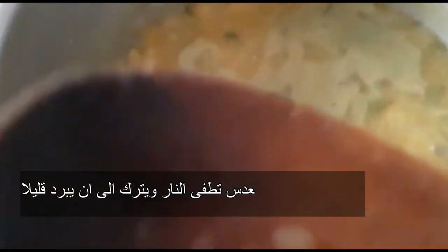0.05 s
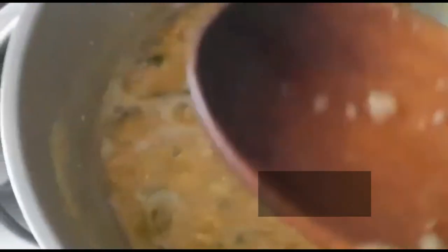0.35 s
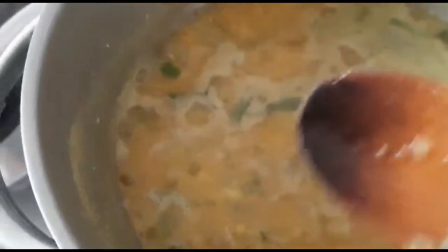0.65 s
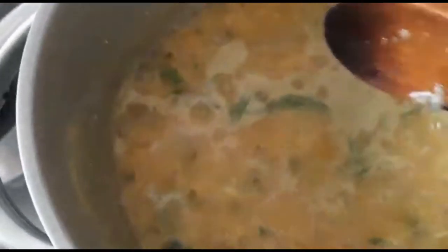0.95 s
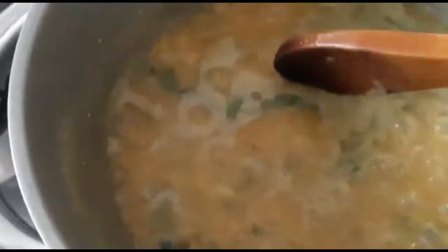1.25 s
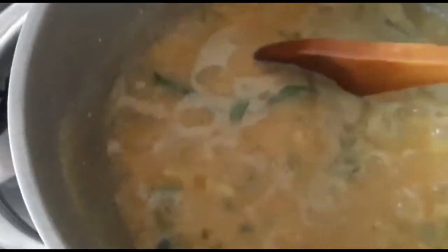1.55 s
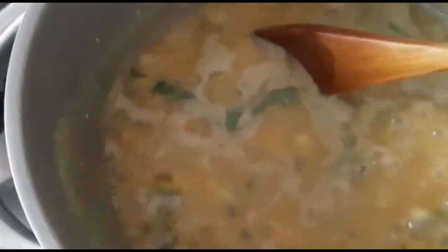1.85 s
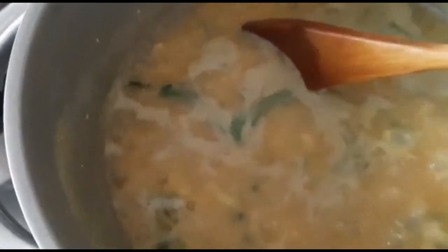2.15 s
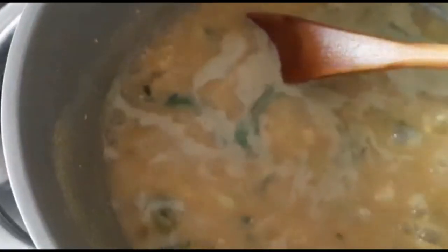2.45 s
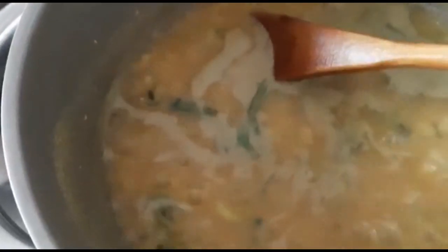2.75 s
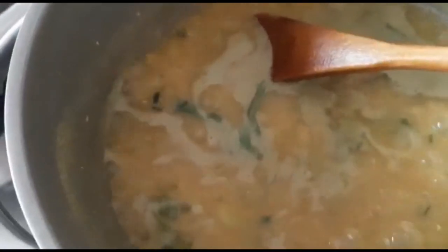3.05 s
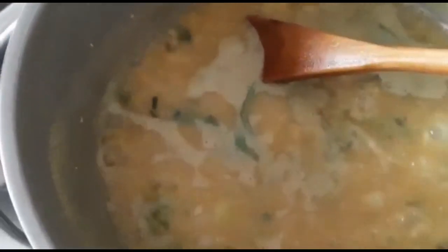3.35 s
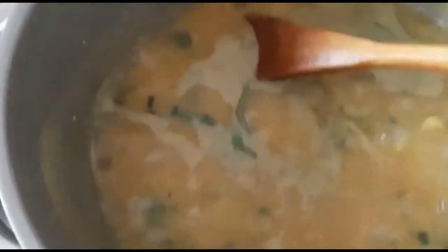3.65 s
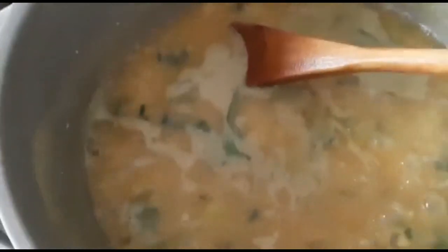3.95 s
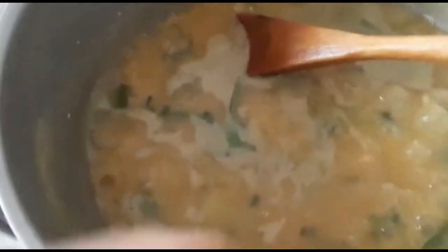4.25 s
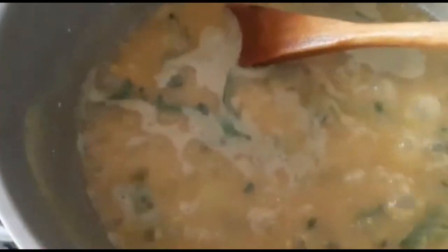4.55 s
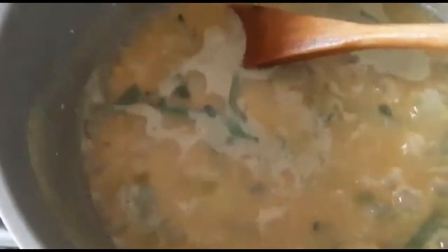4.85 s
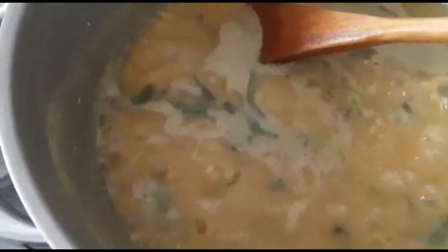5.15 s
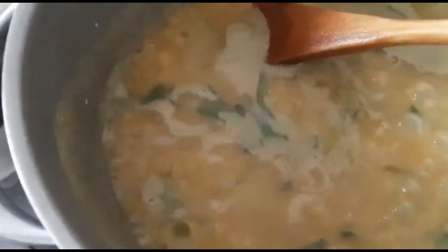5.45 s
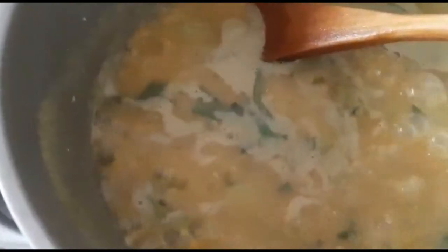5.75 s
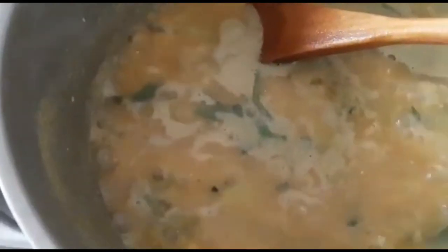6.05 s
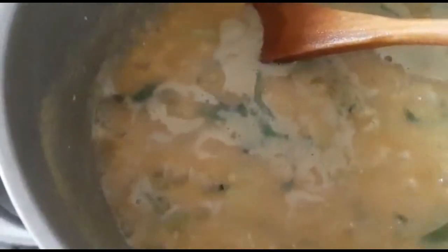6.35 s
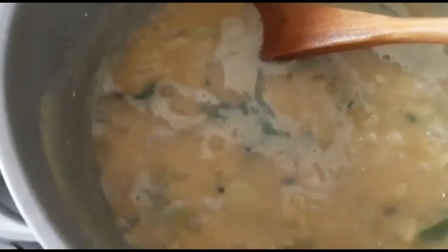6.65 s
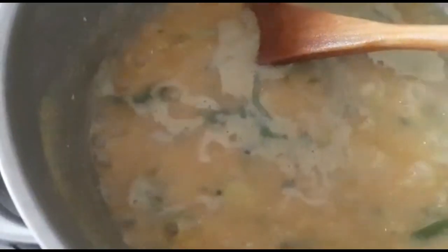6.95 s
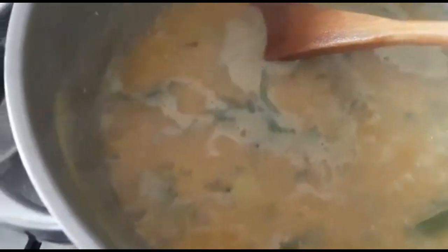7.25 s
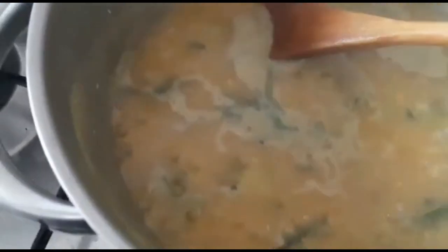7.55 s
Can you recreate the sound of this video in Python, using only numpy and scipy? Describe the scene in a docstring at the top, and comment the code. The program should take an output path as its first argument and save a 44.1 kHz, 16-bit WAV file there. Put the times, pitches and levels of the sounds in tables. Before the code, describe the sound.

Thick lentil soup simmers in a metal pot throughout, heard close and slightly to the left in a kitchen. Many small wet bubbles pop over a soft low rumble with occasional glugs, while droplets tick, spit and sizzle on the hot wall. In the first 0.2 seconds, fingers make two sharp clicks and a bump on the left side of the hand-held microphone. A wooden spoon scrapes the pot faintly and briefly at about 2.6 seconds. From 3.7 to 4.2 seconds comes a cluster of handling clicks and low thumps, much louder than the soup, the heaviest near 3.9. A very faint hiss of steam swells around 5.5 seconds. At 5.7 something knocks once across the kitchen, with a short echo. From about 6 seconds the simmer grows quieter and thinner, with a barely audible whistle near 6.8, still bubbling gently at the end, around 7.6 seconds.

```python
"""Lentil soup simmering

Thick soup simmers in a metal pot: steam rumbles and glugs at the bottom, bubbles pop on top and
drops sizzle on the hot wall, all fading as the simmer ebbs. A spoon scrapes, steam sings at the rim
and a faint whistle passes. Fingers bump and click by the left opening of the hand-held microphone,
and later something is knocked down in the kitchen."""
import sys
import numpy as np
from scipy import signal
from scipy.io import wavfile
from scipy.ndimage import map_coordinates

SR = 44100
rng = np.random.default_rng(int(sys.argv[2]) if len(sys.argv) > 2 else 0)


def digitize_waveform(pressure):
    """Quantize a signal to 16-bit integers and store it at the path in sys.argv[1].

    Rows of a 2-D input are taken as channels; values are limited to [-1, 1].
    """
    field = np.atleast_2d(pressure).T
    bounded = np.clip(field, -1, 1)
    quanta = np.round(bounded * 32767).astype(np.int16)
    wavfile.write(sys.argv[1], SR, quanta)


N = 335160
TIME = np.arange(N) / SR

# How alike left and right sound. Each row: frequency in Hz, likeness from 0 (unrelated) to 1 (same).
STEREO_LIKENESS = [(60, 0.87), (130, 0.94), (300, 0.92), (640, 0.72), (1400, 0), (3000, 0), (15000, 0)]


def from_db(db):
    """Turn decibels into a number to multiply by."""
    return 10 ** (np.asarray(db) / 20)


def rms_one(x):
    """Scale a sound so that its average strength (rms) is 1."""
    return x / np.sqrt(np.mean(x ** 2) + 1e-20)


def at_hz(points, hz):
    """Read a table's value at a frequency, with octaves evenly spaced."""
    freqs, values = np.transpose(points)
    return np.interp(np.log(hz), np.log(freqs), values)


def panned(db):
    """Left and right gains that make the left louder by db."""
    return from_db(np.array([[db], [-db]]) / 2)


def butter(x, hz, kind, order=2):
    """Keep the lows, the highs or a band; a higher order cuts more steeply."""
    return signal.sosfilt(signal.butter(order, hz, kind, fs=SR, output="sos"), x + 1e-18)


def resonance(x, hz, width):
    """Keep a band around hz, about width Hz wide."""
    r = np.exp(-np.pi * width / SR)
    feedback = [1, -2 * r * np.cos(2 * np.pi * hz / SR), r * r]
    return signal.lfilter(np.array([1, 0, -1]) * (1 - r * r) / 2, feedback, x + 1e-18)


def ring(x, hz, fade_s):
    """Each click starts a tone. Here and below, a fade time is the time to drop by 60 dB."""
    r, w = from_db(-60 / (fade_s * SR)), 2 * np.pi * hz / SR
    return signal.lfilter([0, np.sin(w)], [1, -2 * r * np.cos(w), r * r], x + 1e-18)


def add(track, start_s, sound):
    """Mix a sound into a track at a given time."""
    start = max(round(start_s * SR), 0)
    track[..., start:start + sound.shape[-1]] += sound[..., :N - start]


def arch(start_s, length_s):
    """A level that swells from nothing to 1 and back."""
    return np.sin(np.pi * np.clip((TIME - start_s) / length_s, 0, 1))


def drift(per_s):
    """A wandering curve that heads for a new random value per_s times a second."""
    targets = rng.standard_normal(4000)
    return rms_one(map_coordinates(targets, [TIME * per_s], order=1, mode="wrap"))


def grains(per_s, spread_db):
    """Clicks at random moments, many small and a few large."""
    happens = rng.random(N) < per_s / SR
    size = np.minimum(rng.exponential(1, N), 3.5)
    return happens * from_db(spread_db * size) * rng.choice([-1, 1], N)


def noise_bands(spectrum, size=N):
    """Stereo noise in half-octave bands, alike in the bass. Gives their centres in Hz and the bands."""
    edges = 22 * 2 ** np.arange(0, 9.6, .5)
    centres = np.sqrt(edges[1:] * edges[:-1])
    white, bands = rng.standard_normal((2, 2, size)), []
    for k, hz in enumerate(centres):
        mid, side = butter(white[k % 2], edges[k:k + 2], "band")
        alike = at_hz(STEREO_LIKENESS, hz)
        stereo = np.sqrt(1 + alike) * mid + np.sqrt(1 - alike) * side * [[1], [-1]]
        roll_off = min(1, spectrum[-1][0] / hz) ** 2   # quieter above the table's last row
        bands.append(roll_off * from_db(at_hz(spectrum, hz)) * stereo)
    return centres, np.array(bands) / np.std(sum(bands))


def vigour(s):
    """How lively the simmer is at time s, in dB above a full simmer."""
    # The strength of the simmer. Each row: time in seconds, level in dB.
    simmer = [(0.0, -46), (0.19, -51), (1.06, -51.5), (1.37, -52.5), (2.75, -51.5), (3.0, -52), (3.72, -50),
              (3.83, -51), (4.02, -53.5), (4.4, -54), (4.74, -56), (5.19, -54), (5.59, -52), (5.97, -53.5),
              (6.75, -60), (7.01, -59), (7.26, -59.5), (7.6, -60.5)]
    full_simmer_db = -51.5
    return np.interp(s, *np.transpose(simmer)) - full_simmer_db


def simmer_gain(full_db, follows):
    """A gain of full_db at a full simmer that moves by `follows` dB for each dB of vigour."""
    return from_db(full_db + follows * vigour(TIME))


def by_chance(per_s, level_db, ranges):
    """Random events, louder in a lively simmer. Each row: seconds, dB, one value from each range."""
    count = round(per_s * N / SR)
    starts = rng.random(count) * TIME[-1]
    levels = level_db + .54 * vigour(starts) + 1.5 * rng.standard_normal(count)
    return list(zip(starts, levels, *[rng.uniform(low, high, count) for low, high in ranges]))


def rumble():
    """Steam pockets collapse on the bottom, muffled by the thick soup."""
    # The rumble's tone colour. Each row: frequency in Hz, relative level in dB.
    spectrum = [(25, -50), (50, -24), (80, 3), (130, 0.5), (200, -2), (350, 1), (450, -14), (650, -14.5),
                (1000, -17)]
    _, bands = noise_bands(spectrum)
    lumpy = sum(band * from_db(2 * drift(25)) for band in bands)
    return simmer_gain(-47.5, follows=1.55) * rms_one(lumpy)


def small_bubbles():
    """A froth of little pops at many pitches covers the surface and thins out as the simmer ebbs."""
    # The froth's tone colour. Each row: frequency in Hz, relative level in dB.
    spectrum = [(350, -14.5), (500, -25), (640, 6), (850, 3), (1150, -7.5), (1550, -9), (2200, -14),
                (3200, -20), (5000, -45)]
    froth, pitches = np.zeros((2, N)), np.geomspace(400, 3400, 22)
    per_s = 560 * from_db(.6 * vigour(TIME))
    for k, hz in enumerate(pitches):
        bursts = grains(per_s / len(pitches), spread_db=4.3)
        pops = rms_one(ring(bursts, hz, fade_s=5.5 / hz))
        pan_db = 7 * (1 - at_hz(STEREO_LIKENESS, hz)) * (-1) ** k   # left and right by turns
        froth += panned(pan_db) * pops * from_db(at_hz(spectrum, hz)) * np.sqrt(hz)
    heard = in_pot(butter(froth, 654, "high"), pot_db=7, room_db=2.5)
    return simmer_gain(-52.5, follows=.9) * rms_one(heard)


def in_pot(x, pot_db, room_db, room_fade_s=.1):
    """The air in the pot rings along with a sound, then the kitchen echoes it."""
    # The notes of the air above the soup. Each row: pitch in Hz, width in Hz, relative level in dB.
    air_notes = [(603.5, 25, 6), (692, 140, 1), (1490, 67, 2.5), (1538, 49, -8.5), (2076, 41, 0),
                 (2260, 26, -16)]
    hollow = sum(from_db(db) * resonance(x, hz, width) for hz, width, db in air_notes)
    near = x + from_db(pot_db) * hollow
    t = TIME[:SR // 3]
    echoes = rng.standard_normal((2, len(t))) * from_db(-60 * t / room_fade_s) * (t > .002)
    echoes = butter(echoes[0], 730, "low") + butter(echoes, 1130, "high")   # both sides share the lows
    echoes /= np.sqrt(np.sum(echoes ** 2) / 2)
    return near + from_db(room_db) * signal.fftconvolve(near, echoes, axes=1)[:, :N]


def sizzle():
    """Tiny bursts crackle in flurries along the hot wall, over a smooth hiss."""
    # The hiss's tone colour. Each row: frequency in Hz, relative level in dB.
    spectrum = [(1500, 6.5), (2400, 6), (3200, -14), (4500, 8), (5800, 10.5), (7000, -13), (10000, 6.5),
                (15000, -26)]
    crackle, pitches = np.zeros((2, N)), np.geomspace(3800, 6600, 8)
    per_s = 800 * from_db(4.3 * drift(20))
    for hz in pitches:
        bursts = np.array([grains(per_s / len(pitches), spread_db=4.2) for side in range(2)])
        crackle += ring(bursts, hz, fade_s=9 / hz)
    crackle = rms_one(butter(crackle, 2300, "high"))
    _, bands = noise_bands(spectrum)
    return simmer_gain(-61.5, follows=1) * rms_one(crackle + from_db(3) * sum(bands))


def fine_crackle():
    """The tiniest bursts prickle over a faint, very high hiss."""
    bursts = rms_one(np.array([grains(per_s=500, spread_db=5) for side in range(2)]))
    hiss = rng.standard_normal((2, N))
    prickle = butter(hiss + from_db(-1) * bursts, 11850, "high", order=3)
    return simmer_gain(-73.5, follows=.98) * rms_one(prickle)


def finger_bumps(opening_hz=57.4, sharpness=1.27):
    """Fingers push air into the microphone's opening, whose bass cut makes each push swing back."""
    # Pushes of air. Each row: time in seconds, relative level in dB, half-width in seconds.
    bumps = [(0.041, -18.5, 0.00072), (0.178, -3, 0.00083), (3.6864, -13.5, 0.00053), (3.7412, -7, 0.00081),
             (3.8897, 6, 0.001), (4.0336, -16, 0.002), (4.057, -13.5, 0.00024), (4.085, -23, 0.0021),
             (4.1283, -13.5, 0.000087), (4.199, -20, 0.0023), (4.2386, -12.5, 0.00067)]
    pushes, t = np.zeros(N), TIME[:SR // 25]
    middle = t[-1] / 2
    for s, db, width in bumps:
        age = (t - middle) / width
        push = np.exp(-age ** 2 / 2)
        puff = .44 * np.exp(-((age + .99) / .42) ** 2 / 2)   # a brief opposite puff comes first
        add(pushes, s - middle, from_db(db) * (push - puff))
    w = 2 * np.pi * opening_hz
    bass_cut = signal.bilinear([1, 0, 0], [1, w / sharpness, w * w], SR)
    return butter(signal.lfilter(*bass_cut, pushes), 69, "high", order=1)


def finger_clicks():
    """Fingers tap the microphone's casing, which clicks and then rings briefly, hollow or bright."""
    # Taps. Each row: time in seconds, level in dB, pitch in Hz, half-width in seconds,
    # ring level in dB, ring brightness in dB per octave, gritty snap in dB relative to the click.
    taps = [(0.0395, -2, 5400, 0.00011, -26, 7, 3), (0.1766, -11, 3400, 0.00011, -11, -3, 1),
            (3.6843, -6, 5050, 0.00014, -28, 19, -5), (3.8927, -21, 5260, 0.00008, -52, 0, 6.5),
            (4.0557, -26, 3500, 0.00012, -37, -5, 3), (4.1302, -7.5, 4600, 0.00014, -8, -1, -6),
            (4.2383, -14, 610, 0.0012, -20, 3, -25)]
    # The casing's notes. Each row: pitch in Hz, relative level in dB, fade time in seconds.
    casing_notes = [(855, 0.5, 0.0057), (1570, -10.5, 0.007), (2320, -13.5, 0.0052)]
    out, t = np.zeros(N), TIME[:SR // 25]
    middle, lowest_hz = t[-1] / 2, casing_notes[0][0]
    grits = butter(rng.standard_normal((len(taps), len(t))), 6900, "high", order=4)
    for (s, db, hz, width, ring_db, tilt_db, snap_db), grit in zip(taps, grits):
        swell = np.exp(-((t - middle) / width) ** 2 / 2)
        click = np.sin(2 * np.pi * hz * (t - middle)) + from_db(snap_db) * grit
        add(out, s - middle, from_db(db) * swell * click)
        for k, (note_hz, note_db, fade_s) in enumerate(casing_notes):
            start_db = ring_db + note_db + tilt_db * np.log2(note_hz / lowest_hz)
            level = from_db(start_db - 60 * t / fade_s)
            add(out, s, (-1) ** k * level * np.sin(2 * np.pi * note_hz * t))
    return out


def spits():
    """A splash hits the hot wall, flashes to steam and dies away, sputtering."""
    # Splashes. Each row: start in seconds, relative level in dB, fade time in seconds.
    splashes = [(0.059, -49, 0.15), (.295, -52, 0.22), (0.52, -47, 0.3), (1.214, -48, 0.29),
                (1.617, -35.5, 0.26), (3.398, -36, 0.16), (4.021, -41, 0.14), (5.845, -37.5, 0.091),
                (6.07, -53, 0.34), (6.921, -76, 0.14)]
    steam, t = np.zeros((2, N)), TIME[:SR // 3]
    for s, db, fade_s in splashes:
        add(steam, s, rng.standard_normal((2, len(t))) * from_db(db - 60 * t / fade_s))
    sputter = rms_one(from_db(3 * drift(500)))
    return butter(butter(steam * sputter, 2330, "high"), 7140, "low", order=1)


def bubble(t, hz, cycles, rise):
    """The hollow of one open bubble rings for a few cycles while its pitch rises."""
    t = np.maximum(t, 0)
    age = t * hz / cycles
    pitch = hz * (1 + rise * (np.minimum(age, .5) - .15)) * (t > 0)
    swell = (1 - np.exp(-2 * t * hz)) ** 2
    level = swell * from_db(-60 * age)
    return np.sin(2 * np.pi * np.cumsum(pitch) / SR) * level / level.max()


def large_bubbles(rise=.7, snap_s=.0016):
    """A bubble's skin tears with a snap, its hollow rings, and a smaller one follows as the soup closes."""
    # The largest bursts. Each row: start in seconds, relative level in dB, pitch in Hz,
    # left over right in dB, ring length in cycles.
    biggest = [(0.0616, -29, 1460, 16, 2.6), (0.0665, -35, 2060, 7, 4), (0.0775, -39, 1900, 9, 3.7),
               (0.0922, -36.5, 790, 20, 4.3), (0.1951, -31.5, 700, 2, 5.5), (0.2658, -36, 1290, 3, 1.6),
               (0.3036, -33.5, 1040, 8, 5.2), (0.3144, -37, 1610, -2, 8.5), (0.3564, -33, 780, 1, 11),
               (0.4102, -32.5, 980, 1, 12), (0.4514, -34.5, 820, 2, 6.1), (0.4914, -36, 1550, -1, 6.1),
               (0.5211, -33.5, 1510, 1, 10), (0.5436, -39.5, 1560, 2, 10), (0.5682, -31.5, 1400, -7, 10),
               (0.5849, -43, 1520, 9, 8.8), (0.6172, -43, 760, 1, 8.8), (0.644, -47, 780, 0, 8.9),
               (0.6615, -43, 790, 4, 5.2), (0.6873, -37.5, 730, 1, 12), (0.7749, -37, 1150, 7, 8),
               (0.8028, -31.5, 750, 0, 7.5), (0.8272, -46, 710, 1, 11), (0.8822, -38.5, 775, -2, 6.3),
               (0.972, -38, 710, 0, 21), (1.1595, -38, 850, 3, 6.4), (1.1873, -39.5, 1470, -5, 4.6),
               (1.2142, -39.5, 780, 4, 10), (1.2999, -40.5, 1380, 9, 16), (1.329, -47, 775, 11, 13),
               (1.3864, -45, 746, 4, 8.9), (1.4231, -40.5, 1380, 3, 6.1), (1.4776, -40, 765, 1, 5.9),
               (1.58, -34.5, 760, 1, 7.9), (1.6103, -35, 1860, 2, 3), (1.6396, -36.5, 1280, -6, 6.2),
               (1.6794, -34.5, 1480, 3, 6.8), (1.731, -40.0, 1390, 4, 9), (1.8467, -29.5, 1180, 4, 5),
               (1.862, -35, 910, 2, 7.2), (1.8792, -41.5, 1500, 2, 13), (1.9635, -37.0, 1430, 2, 6.5),
               (2.0063, -37, 765, 3, 5.7), (2.0741, -39.5, 756, 3, 8.5), (2.1128, -38.5, 2000, 5, 15),
               (2.157, -42.5, 690, 0, 10), (2.2346, -42, 1610, -4, 16), (2.276, -35, 750, 5, 6.1),
               (2.3006, -31.5, 1040, 4, 2), (2.3608, -32.5, 890, 4, 5), (2.3745, -39.5, 1520, 1, 7.8),
               (2.3918, -36, 780, 1, 4.5), (2.4121, -33, 1230, 6, 3.8), (2.5011, -35, 1020, 0, 5.1),
               (2.5473, -41, 1520, 10, 10), (2.5716, -37.5, 1450, 10, 12), (2.6451, -34, 700, 5, 5),
               (2.6678, -40.5, 1600, 16, 4), (2.7043, -36.5, 1490, 12, 14), (2.738, -36, 750, 2, 4.4),
               (2.7985, -43, 1450, 12, 10), (2.8142, -38, 875, 2, 6.4), (2.8484, -38.5, 1810, 4, 9.1),
               (2.8822, -37.5, 756, 2, 7), (2.9246, -37, 1390, -1, 3), (2.9897, -43, 1580, -5, 9.2),
               (3.0256, -40, 740, 0, 5.4), (3.0726, -33, 866, 3, 4.4), (3.1105, -38, 2400, 2, 8.5),
               (3.1194, -26.0, 1140, 3, 3.4), (3.1437, -41, 756, 3, 10), (3.24, -32.5, 1060, 0, 9.3),
               (3.2924, -33.5, 1100, 7, 10), (3.4007, -31.5, 2110, 9, 2.2), (3.5024, -37, 806, 4, 11),
               (3.7034, -27, 1430, 0, 2.4), (3.7266, -31.5, 1440, -7.5, 10), (3.7626, -33, 1500, -5, 9.3),
               (3.8503, -31.5, 1800, 4, 4.3), (4.0034, -37, 1800, 14, 3.7), (4.0294, -31.5, 1570, 8, 3.6),
               (4.2045, -28.5, 1500, 6, 1.6), (4.2898, -40, 1130, 5, 2.8), (4.3221, -29, 1400, 5, 2.8),
               (4.3376, -44, 1180, 0, 3.8), (4.4062, -33, 1510, 0, 4.2), (4.4308, -37.5, 1340, 7, 2.8),
               (4.4963, -37.5, 1390, 2, 8.4), (4.5231, -37, 1390, 4, 3), (4.5517, -34.5, 1450, 1, 13),
               (4.5689, -44, 776, 5, 5), (4.5924, -38.0, 1480, 4, 19), (4.671, -41, 1050, 4, 13),
               (4.721, -36.5, 1380, 3, 4.1), (4.7928, -41.5, 1350, 7, 6.4), (4.8217, -48.5, 670, 1, 7.7),
               (4.9181, -45.5, 930, 4, 10), (4.9513, -35.5, 1800, 4, 4.9), (4.9953, -44, 1330, 2, 4.8),
               (5.0107, -38.0, 905, 3, 5.6), (5.0734, -43, 766, 6, 6.4), (5.2111, -29.5, 1380, 3, 16),
               (5.2339, -47, 1440, 3, 12), (5.3569, -41, 2150, 0, 13), (5.3978, -30.5, 1320, 2, 5.1),
               (5.4187, -38.5, 740, 0, 6.4), (5.4373, -42, 750, 6, 5.2), (5.4804, -36, 890, 6, 8.8),
               (5.8748, -31, 1380, 2, 3.5), (6.0285, -38, 920, 0, 3.4), (6.0541, -36.5, 844, 1, 2.7),
               (6.0684, -42, 1400, 7, 12), (6.0953, -37.5, 1020, 5, 7.8), (6.1817, -42, 1450, 3, 10),
               (6.1966, -36.5, 694, 3, 5.1), (6.2837, -35, 1500, 2, 10), (6.3816, -37.5, 1390, -1, 8.9),
               (6.4279, -35, 990, 2, 3.3), (6.4492, -35.5, 1490, 5, 12.5), (6.522, -39.5, 1470, 10, 10),
               (6.537, -58, 1520, -4, 8.1), (6.6109, -41, 1940, 7, 2.6), (6.6464, -46.5, 800, 7, 17),
               (6.7069, -46.5, 780, 4, 4.5), (6.7334, -52, 810, 1, 11), (6.7637, -42, 930, 2, 2.3),
               (6.7953, -55, 820, -2, 6.3), (6.9281, -43, 690, 2, 5), (7.0805, -51, 654, 7, 10),
               (7.1341, -43, 1440, 4, 3.8), (7.2178, -43.5, 800, 2, 5.4), (7.2652, -45, 730, 3, 8.4),
               (7.3257, -41.5, 790, 5, 2.8), (7.3491, -40.5, 1310, 4, 5.6), (7.3951, -51, 1410, 8, 11),
               (7.472, -44, 2040, 6, 3.5), (7.5449, -44, 730, 1, 5.4)]
    pops = list(biggest) + by_chance(per_s=8, level_db=-45, ranges=[(794, 1970), (-9, 11), (4.6, 7.2)])
    out, t = np.zeros((2, N)), TIME[:SR // 20]
    tears = rng.standard_normal((len(pops), 2, len(t))) * np.exp(-t / snap_s)
    for (s, db, hz, pan_db, cycles), tear in zip(pops, tears):
        first = bubble(t, hz, cycles, rise * rng.uniform(.2, 1.6))
        lag_s = rng.uniform(-.0002, .0002)   # its place decides which side hears it first
        after_s, after_hz = rng.uniform(.0015, .007), hz * rng.uniform(.7, 1.45)
        tone = first + from_db(-6) * bubble(t - after_s, after_hz, cycles, rise)
        stereo = np.array([np.interp(t - max(lag, 0), t, tone) for lag in (lag_s, -lag_s)])
        snap = from_db(3) * butter(tear, 1.3 * hz, "low", order=3)
        add(out, s, from_db(db - 1) * panned(pan_db) * (stereo + snap))
    return in_pot(butter(out, 460, "high", order=3), pot_db=-2, room_db=-3.5)


def hand_grip():
    """The hand shifts on the microphone and the casing rumbles softly."""
    # Shifts of the hand. Each row: start in seconds, length in seconds, level in dB.
    shifts = [(.25, 0.1, -41), (3.44, .16, -46), (5.39, 0.24, -50)]
    level = sum(from_db(db) * arch(s, length_s) for s, length_s, db in shifts)
    return level * rms_one(butter(rng.standard_normal(N), [47, 108], "band"))


def droplet_ticks(rise_s=.00045, fizz_s=.011):
    """A droplet snaps on the hot wall in about a millisecond and leaves a trace of fizz."""
    # The sharpest snaps. Each row: start in seconds, relative level in dB, pitch in Hz.
    sharpest = [(0.382, -48, 5000), (0.5163, -28.5, 5360), (1.0042, -41, 4900), (2.0067, -44, 5640),
                (2.3631, -45, 5130), (2.4124, -40.5, 5070), (2.9259, -39, 4600), (2.9947, -42.5, 5800),
                (3.1676, -42, 5470), (3.2658, -49, 4600), (3.5997, -41.5, 5160), (3.8492, -39, 5100),
                (4.0705, -42, 3420), (4.2903, -39.5, 3700), (4.3246, -42.5, 3760), (4.5949, -38.5, 3700),
                (4.7242, -43.5, 5500), (4.9566, -45, 4700), (4.9787, -40, 5170), (5.1176, -42.5, 5650),
                (5.2331, -44, 5830), (5.8452, -40, 5140), (6.0729, -44, 4100), (6.1705, -43, 4700),
                (6.247, -44, 5060), (6.2827, -53, 3470), (6.3837, -51, 4500), (6.3996, -45.5, 4770),
                (6.4491, -57, 4300), (6.4714, -49.5, 4700), (6.5201, -44, 4660), (6.645, -48, 5430),
                (6.7, -52, 5560), (6.7418, -52, 5260), (6.824, -50.5, 5300), (6.8873, -49.5, 4720),
                (6.9206, -49, 4960), (7.0963, -49, 5240), (7.1246, -50, 5500), (7.2715, -53, 3830),
                (7.308, -52.5, 5300), (7.3524, -49.5, 3800), (7.4713, -47, 3100)]
    drops = list(sharpest) + by_chance(per_s=12, level_db=-48, ranges=[(3960, 5860)])
    out, t = np.zeros((2, N)), TIME[:SR // 40]
    swell = (t / rise_s * np.exp(1 - t / rise_s)) ** 2
    for s, db, hz in drops:
        snap = swell * np.sin(2 * np.pi * hz * t)
        fizz = butter(rng.standard_normal((2, len(t))), [2200, 6500], "band") * np.exp(-t / fizz_s)
        add(out, s, from_db(db - .5) * (snap + from_db(-7.5) * fizz))
    return out


def glugs(swell_cycles=.43):
    """A steam pocket heaves up, throbs a few times and is stilled by the thick soup."""
    # The biggest pockets. Each row: start in seconds, relative level in dB, pitch in Hz.
    biggest = [(1.02, -35, 181), (1.15, -39, 135), (1.69, -38, 151), (1.878, -35, 132), (1.888, -32, 197),
               (2.04, -39, 150), (3.532, -33, 176), (5.211, -34.5, 312), (5.873, -32, 286),
               (6.518, -38.5, 315), (6.986, -39.5, 108)]
    out, t = np.zeros(N), TIME[:SR // 6]
    for s, db, hz in list(biggest) + by_chance(per_s=2, level_db=-39.5, ranges=[(126, 235)]):
        age = t * hz / swell_cycles
        add(out, s, from_db(db - 2.5) * age * np.exp(1 - age) * np.sin(2 * np.pi * hz * t))
    return out


def spoon_rasp():
    """The wet wooden spoon slips on the metal wall in a quick run of tiny catches."""
    catches = rng.standard_normal((2, N)) * from_db(2.5 * drift(400))
    rasp = rms_one(butter(catches, [3100, 5900], "band", order=3))
    return from_db(-53) * arch(start_s=2.598, length_s=.14) * rasp


def singing_steam():
    """Steam squeezes out at the rim in a thin, pitched hiss that swells and dies."""
    # The steam's notes. Each row: pitch in Hz, width in Hz, level in dB.
    notes = [(7000, 800, -76), (14500, 2600, -82)]
    hiss = rng.standard_normal((2, N))
    song = sum(from_db(db) * rms_one(resonance(resonance(hiss, hz, width), hz, width))
               for hz, width, db in notes)
    return arch(start_s=5.25, length_s=.5) ** 2 * song


def knock(start_s=5.6905):
    """A blow across the kitchen, mostly echo: the lows swell later and last longer, the highs rattle."""
    # The echo's tone colour. Each row: frequency in Hz, relative level in dB.
    spectrum = [(35, -41), (60, -6), (105, -1), (230, -1), (330, -4.5), (450, -0.5), (640, 5.5), (900, -9),
                (1190, -0.5), (1770, -7.5), (2040, -4), (3160, -18.5), (4700, -7), (6700, -28),
                (9500, -17.5), (13400, -14.5)]
    # How long the echo lasts. Each row: frequency in Hz, fade time in seconds.
    fades = [(100, 0.6), (300, 0.42), (600, 0.39), (1500, 0.32), (5000, 0.29), (12000, 0.27)]
    # The notes the blow sets ringing. Each row: pitch in Hz, relative level in dB, fade time in seconds.
    notes = [(115.4, -26.5, 0.46), (343, -32, 0.49), (558, -29, 0.2), (569, -14.5, 0.12),
             (589, -28.5, 0.41), (690, -25, 0.16), (790, -32.5, 0.42), (1140, -33, 0.36), (1210, -31, 0.17),
             (2075, -36, 0.28), (3965, -33, 0.18)]
    out, t = np.zeros((2, N)), TIME[:SR]
    centres, bands = noise_bands(spectrum, size=SR)
    rattle_db = 3 * drift(300)[:SR]
    for hz, band in zip(centres, bands):
        rise_s = .006 * (.5 + 350 / hz)
        swell = 1 - np.exp(-t / rise_s)
        level_db = -22.5 + rattle_db * (hz > 2000) - 60 * t / at_hz(fades, hz)
        add(out, start_s, from_db(level_db) * swell * band)
    for hz, db, fade_s in notes:
        swell = 1 - np.exp(-t * hz / 3)
        add(out, start_s, from_db(db - 3.4 - 60 * t / fade_s) * swell * np.sin(2 * np.pi * hz * t))
    return out


def whistle():
    """A faint, thin tone wavers as it rises and falls."""
    swell = arch(start_s=6.69, length_s=.34)
    pitch_hz = (2420 + 129 * swell) * (1 + .0089 * drift(150))
    return np.sqrt(2) * from_db(-76) * swell * np.sin(2 * np.pi * np.cumsum(pitch_hz) / SR)


def microphone(x, left_lag_s=.00012):
    """Both openings dull the highs; the right is more muffled, and the left is delayed to stay in step."""
    left, right = butter(x, 6926, "low", order=14)
    left = np.roll(left, round(left_lag_s * SR))
    right = butter(right, 3600, "low", order=4)
    leaked_highs = from_db(-24) * butter(x, 9500, "high", order=3)
    return np.array([left, right]) + leaked_highs


def scene():
    """The pot in front and to the left, the fingers on the left, the knock out in the room."""
    surface = small_bubbles() * panned(5.3) + large_bubbles()
    bottom = rumble() * panned(.56) + glugs()
    wall = (sizzle() + spits() + droplet_ticks() + spoon_rasp()) * panned(9.8)
    prickle = fine_crackle()
    pot = surface + bottom + wall + whistle() * panned(17)
    hand = hand_grip() + (finger_bumps() + finger_clicks()) * from_db([[0], [-53]])
    dulled = microphone(pot + hand + knock() * panned(1.9))
    return dulled + prickle + singing_steam() * panned(16)


def record(dry):
    """Peaks past full scale are clipped, and the very highest sounds are cut away."""
    top_cut = signal.ellip(10, .1, 80, 16200, fs=SR, output="sos")
    return signal.sosfilt(top_cut, np.clip(dry, -1, 1))


dry = scene()
out = record(dry)
digitize_waveform(out)
```